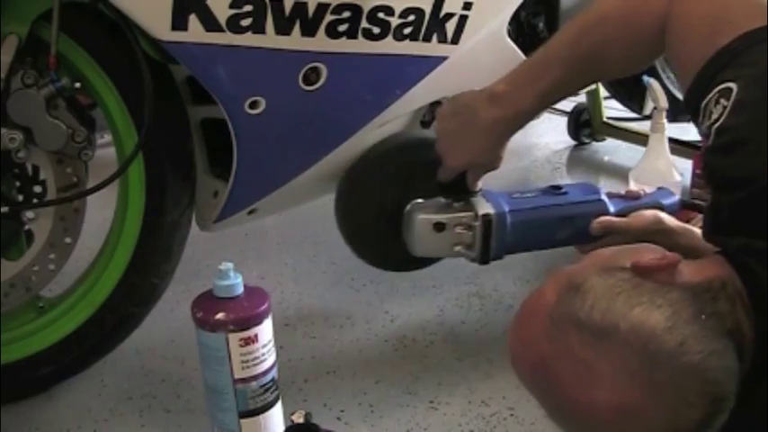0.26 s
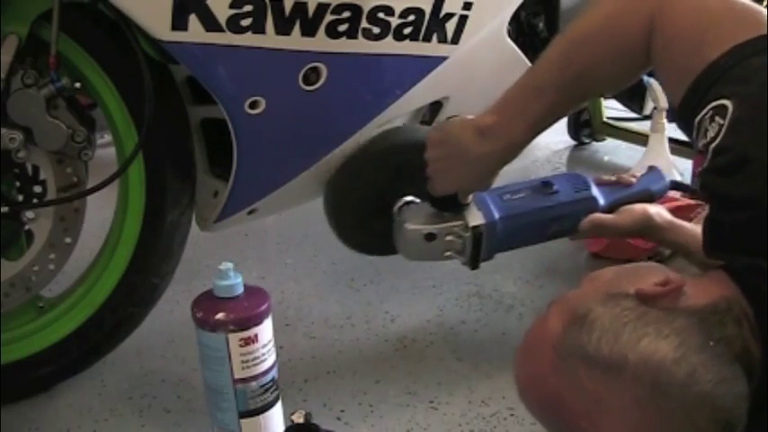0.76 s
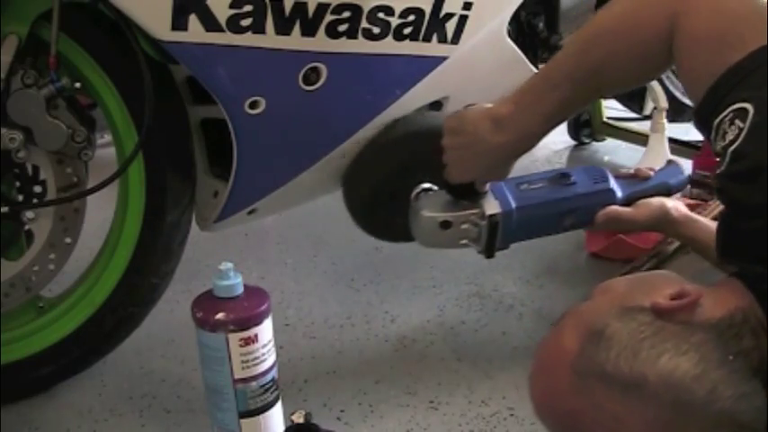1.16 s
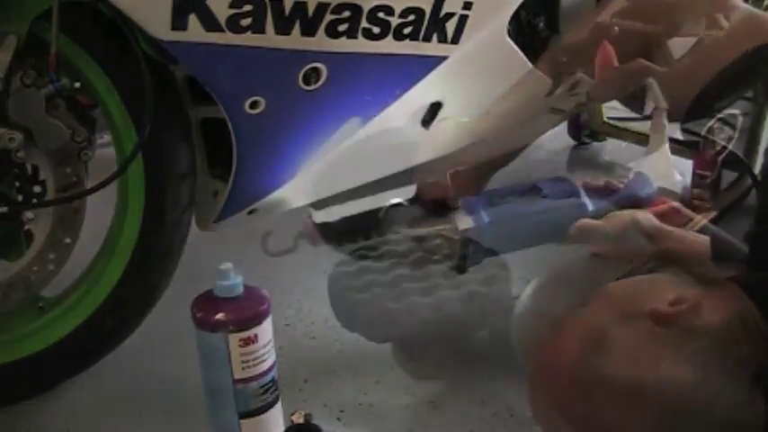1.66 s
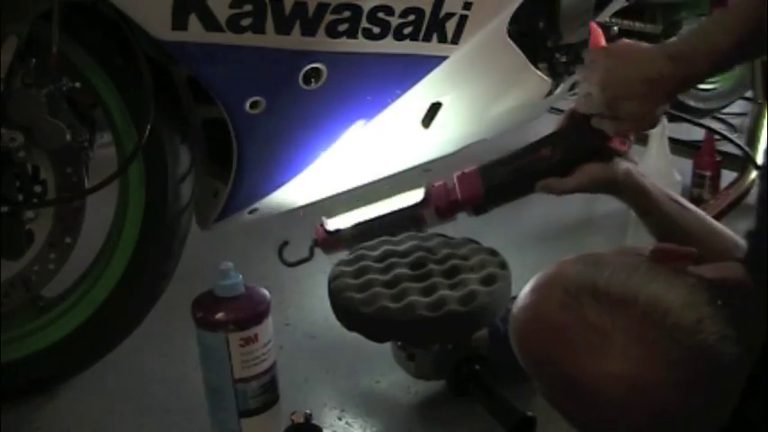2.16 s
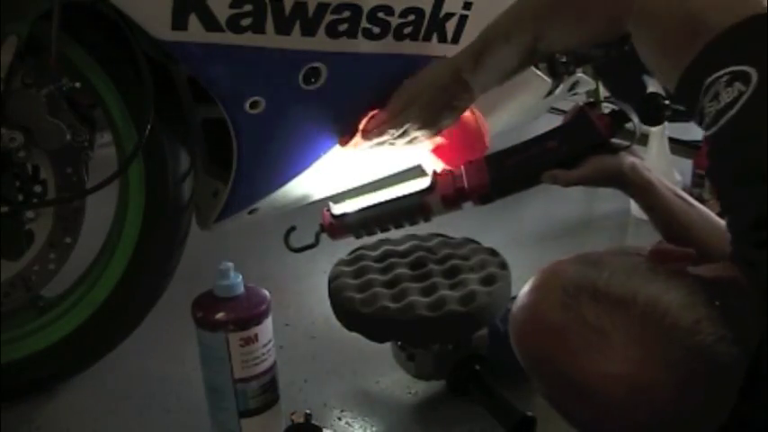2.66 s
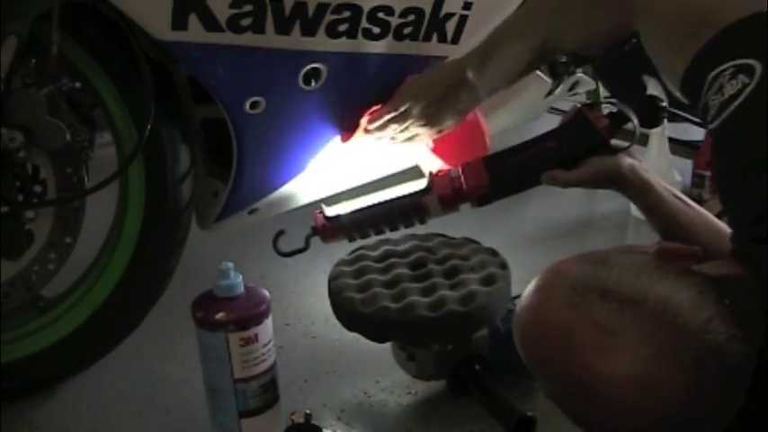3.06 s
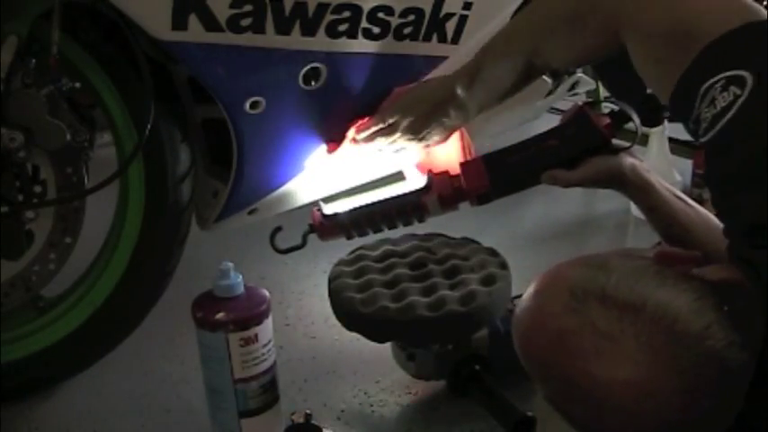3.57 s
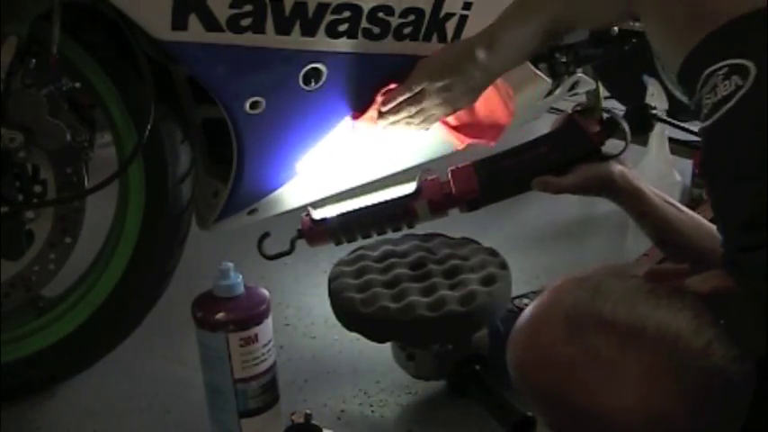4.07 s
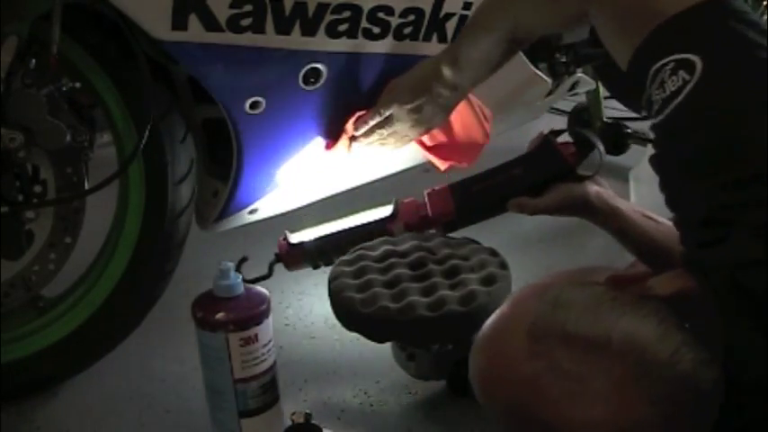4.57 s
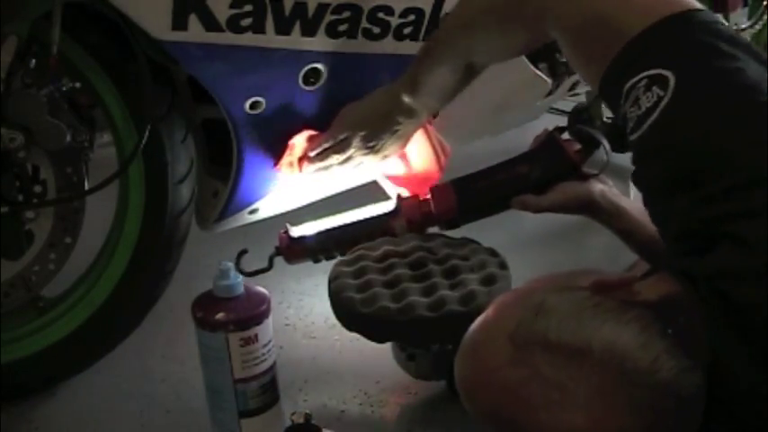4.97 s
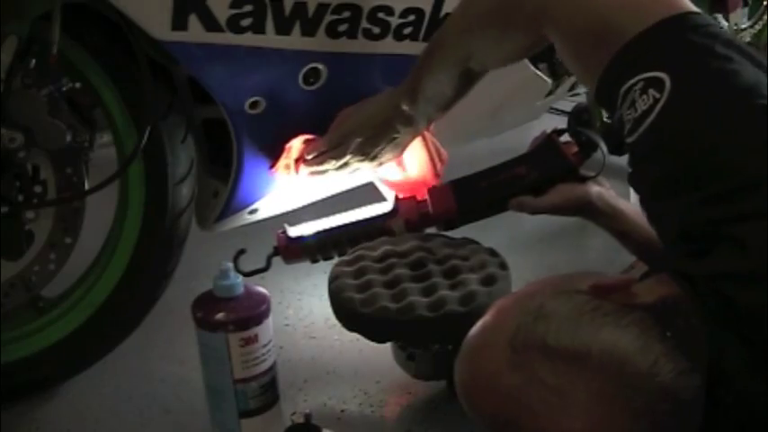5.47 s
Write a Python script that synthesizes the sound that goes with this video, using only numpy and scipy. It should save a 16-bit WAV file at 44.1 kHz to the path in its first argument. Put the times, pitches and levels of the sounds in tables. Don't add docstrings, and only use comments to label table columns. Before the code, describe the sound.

In a garage, an electric rotary polisher runs close to a camcorder microphone, a rough mid-pitched grinding whir with whine, mains buzz and airy fan noise. It swells for about a second, ticks with grit, then fades out by two seconds. Afterwards only faint hiss remains, with soft cloth wipes and a few dull bumps and fingertip taps on a plastic panel.

```python
import sys
import numpy as np
from scipy import signal
from scipy.fft import rfft, irfft
from scipy.io import wavfile
from scipy.ndimage import uniform_filter1d, map_coordinates

SR = 44100
rng = np.random.default_rng(int(sys.argv[2]) if len(sys.argv) > 2 else 0)


def amplitude_ratio(level_db):
    exponent = np.asarray(level_db, float) / 20
    return 10 ** exponent


def dump_mix(stems):
    frames = np.atleast_2d(stems).T
    limited = np.clip(frames, -1, 1)
    pcm = np.round(limited * 32767).astype(np.int16)
    wavfile.write(sys.argv[1], SR, pcm)


N = 252252
T = np.arange(N) / SR
RUN = T[:int(2.1 * SR)]
RING = T[:8192]
MAINS_HZ = 60
FADE_S, SILENT_S = 1.498, 2.018


def unit(x):
    return x / np.sqrt(np.mean(x ** 2))


def colour(x, points, rings=()):
    hz, db = np.transpose(points)
    bins = np.arange(1, len(x) // 2 + 2) * SR / len(x)
    gain_db = np.interp(np.log(bins), np.log(hz), db)
    for centre, width, lift in rings:
        gain_db += lift / (1 + (2 * (bins - centre) / width) ** 2)
    return irfft(rfft(x) * amplitude_ratio(gain_db), len(x))


def filtered(x, hz, kind="low"):
    return signal.lfilter(*signal.butter(2, hz, kind, fs=SR), x)


def walk(rate, size=len(RUN)):
    k = int(SR / rate)
    held = np.repeat(rng.standard_normal(400), k)[:size + 3 * k]
    slewed = uniform_filter1d(uniform_filter1d(held, k), k)
    return 1.16 * slewed[k:size + k]


def burst(t60, rise=.0005):
    return amplitude_ratio(-60 * RING / t60) - amplitude_ratio(-60 * RING / rise)


def add(out, s, sound):
    start = int(s * SR)
    out[start:start + len(sound)] += sound


# speed_multiple, level_db, unsteadiness_db
ORDERS = [(1.976, -36.5, 3), (5.965, -21.5, -0.3), (9.05, -34, 6), (12.08, -28, 2), (13.06, -26.5, -5),
          (16, -24.5, -0.5), (17.89, -19, -1), (19.06, -20.5, 1.5), (36.2, -23, 2), (37, -23.5, 1.5),
          (38.9, -23.5, 4.5), (43.5, -28, -1), (48.4, -28, -6)]
# centre_hz, width_hz, lift_db
RESONANCES = [(488, 24, 2.5), (670, 210, 2), (965, 37, 7.5), (1420, 190, 4.5), (1850, 130, 2),
              (2103, 90, 4.5), (2770, 160, 3), (3100, 170, 4.5), (3760, 160, 2)]


def whine(turns):
    out = np.zeros(len(RUN))
    for k, db, wobble_db in ORDERS:
        level = amplitude_ratio(db + wobble_db * walk(7.093))
        jitter_turns = (.012 + 0.0023 * k) * walk(24.65)
        out += level * np.sin(2 * np.pi * (k * turns + jitter_turns))
    to_end_s = np.minimum(RUN, SILENT_S - RUN)
    effort_db = 1 - 5 * np.clip(1 - to_end_s / 0.23, 0, 1)
    return colour(out, [(1, 0), (20000, 0.0043)], RESONANCES) * amplitude_ratio(effort_db)


# mains_multiple, level_db
HARMONICS = [(1, -51), (3, -34.5), (4, -35), (5, -23.5), (8, -26.5), (9, -29.5), (12, -26.5), (24, -24)]


def buzz(mains):
    out = np.zeros(len(RUN))
    for k, db in HARMONICS:
        level = amplitude_ratio(db + 1.1 * walk(5.7))
        out += level * np.sin(2 * np.pi * (k * mains + rng.random()))
    return out


def clatter(turns, memory, knock_db):
    size = 640
    knocks = np.minimum(rng.exponential(size=(200, size)), 5)
    fresh = rng.standard_normal((200, size)) * amplitude_ratio(knock_db * knocks)
    pattern = signal.lfilter([1], [1, -np.clip(memory, 0, .95)], fresh, axis=0).ravel()
    return unit(map_coordinates(pattern, [turns * size], order=3))


# pitch_hz, level_db (per Hz)
HOUSING = [(13, -68), (22, -34.5), (141, -17), (263, -16), (295, -12.5), (355, -10), (458, -4), (515, -7),
           (857, -6), (985, -6.5), (1130, -7.5), (1390, -6), (2320, -6.5), (3610, -5.5), (5600, -30),
           (7280, -51), (12300, -120)]


def gears(turns, mains, spin):
    chop = 0.073 * np.cos(2 * np.pi * mains) + 0.1 * np.cos(4 * np.pi * mains)
    rub = clatter(turns, memory=0.34, knock_db=2.5)
    rub = rub * (1 + spin + chop) * amplitude_ratio(0.54 * walk(44.96))
    return unit(colour(rub, HOUSING, RESONANCES))


def bounce(x, delay_s, share):
    return x + share * map_coordinates(x, [np.arange(len(x)) - delay_s * SR], order=3)


# pitch_hz, level_db (per Hz)
VENT_AIR = [(2350, -27), (4000, 0.5), (4720, -11), (5350, -14), (6390, -8), (6960, -9), (7760, -10),
            (9010, -6), (10300, -13), (11000, -13), (12600, -20.5), (14600, -29.5), (15700, -45)]


def fan_air(turns, spin):
    air = clatter(turns, memory=0.075, knock_db=2.5)
    air = air * (1 + .9 * spin) * amplitude_ratio(1.23 * walk(15.85))
    fifth_peak_hz = 8500 + 230 * RUN
    air = bounce(air, 5 / fifth_peak_hz, share=0.12)
    return unit(colour(air, [(2000, -55)] + list(VENT_AIR)))


def flares(table, width_hz, length_s):
    out = np.zeros(len(RUN))
    for s, hz, db in table:
        swell = np.sqrt(np.cos(np.pi * np.clip((RUN - s) / length_s, -.5, .5)).clip(0))
        a = unit(filtered(rng.standard_normal(len(RUN)), width_hz / 2))
        b = unit(filtered(rng.standard_normal(len(RUN)), width_hz / 2))
        band = a * np.cos(2 * np.pi * hz * RUN) + b * np.sin(2 * np.pi * hz * RUN)
        out += amplitude_ratio(db) * swell * band
    return out


# middle_s, pitch_hz, level_db
FAIRING_FLARES = [(0.37, 967, -9.5), (1.03, 978, -15), (1.78, 1100, -25), (0.42, 1211, -17),
                  (0.9, 1211, -19.5)]
PANEL_FLARES = [(0.41, 2095, -12), (0.42, 2700, -21), (0.73, 3180, -11.5), (0.68, 3710, -18),
                (0.98, 3600, -9.5), (0.98, 2790, -11.5), (0.93, 1780, -14.5), (1.319, 3150, -18),
                (1.53, 3730, -11.5), (1.65, 1755, -13.5), (1.8, 2730, -15)]
VENT_FLARES = [(.15, 10700, -33), (.52, 6880, -27), (.7, 9220, -24), (1.0, 10800, -32), (1.25, 9120, -22.5),
               (1.25, 7200, -28.5), (1.68, 8750, -22.5), (1.6, 12300, -36), (1.8, 7090, -31)]


def body():
    fairing = flares(FAIRING_FLARES, width_hz=4, length_s=0.5)
    panel = flares(PANEL_FLARES, width_hz=67, length_s=0.46)
    vents = flares(VENT_FLARES, width_hz=160, length_s=0.59)
    return fairing + panel + vents


# time_s, armature_hz
ARMATURE = [
    (0, 78.54),
    (.14, 77.88),
    (.27, 80.46),
    (.54, 79.74),
    (.78, 75.06),
    (1.1, 76.5),
    (1.25, 76.4),
    (1.39, 71.04),
    (1.72, 74.37),
    (2.0, 72.4),
]


def polisher():
    turns = np.cumsum(np.interp(RUN, *np.transpose(ARMATURE))) / SR
    mains = MAINS_HZ * RUN
    spin = 0.14 * np.cos(2 * np.pi * turns) + 0.098 * np.cos(4 * np.pi * turns)
    tones = 1.58 * (whine(turns) + buzz(mains))
    air_db = -14 - 4.5 * np.maximum(RUN - FADE_S, 0) + 1.48
    return amplitude_ratio(-1.0) * gears(turns, mains, spin) + tones + body() + amplitude_ratio(air_db) * fan_air(turns, spin)


# pitch_hz, side_minus_mid_db
WALL_RETURN = [(60, -4), (110, -6), (200, -11), (380, -17), (700, -18), (1290, -18), (2380, -12.5),
               (4400, -12), (6000, -8), (8120, -14), (11000, -6), (15000, -4)]


def garage(tool):
    echo = rng.standard_normal(len(RING)) * burst(0.38)
    returned = signal.fftconvolve(tool, echo / np.linalg.norm(echo))[:len(RUN)]
    return colour(returned, WALL_RETURN)


# start_s, level_db (peak), pitch_hz, crack_db
GRIT = [
    (0.3489, -12, 2870, -15),
    (1.1766, -14, 2767, -23),
    (1.182, -14, 2770, -23),
    (1.2150, -13, 3410, -12),
    (1.7078, -10, 3528, -27),
    (1.7464, -9.5, 3060, -17),
]


def ticks():
    out = np.zeros(len(RUN))
    for s, db, hz, crack_db in GRIT:
        ring = np.sin(2 * np.pi * hz * RING) * burst(.007, 0.0016)
        crack = rng.standard_normal(len(RING)) * burst(.012)
        add(out, s, amplitude_ratio(db) * (2.0 * ring + amplitude_ratio(crack_db) * crack))
    return out


# pitch_hz, level_db (per Hz)
MIC_NOISE = [(15, -43), (25, -29), (59, -3), (268, -3), (360, -2.5), (525, -3), (635, -2), (1120, -5.5),
             (1770, -7), (2020, -9.5), (3200, -10), (4070, -13), (5940, -16.5), (7990, -18), (14100, -33),
             (15700, -35)]


def hiss():
    level_db = -64.5 + 1.06 * (T - SILENT_S) - 6.5 * np.maximum(T - 5.16, 0)
    pair = np.array([unit(colour(rng.standard_normal(N), MIC_NOISE)) for _ in range(2)])
    return pair * amplitude_ratio(level_db + 14.0)


# start_s, level_db (peak), pitch_hz, ring_s
KNOCKS = [
    (2.565, -45, 293, 0.061),
    (2.679, -46, 773, 0.067),
    (3.619, -47, 393, 0.08),
    (4.549, -47, 756, 0.08),
    (4.889, -39, 357, 0.1),
    (5.07, -43, 856, 0.096),
    (5.093, -38.5, 730, 0.1),
    (5.129, -43, 376, 0.11),
    (5.225, -45, 800, 0.12),
]
# start_s, level_db (peak), pitch_hz, ring_s
FINGERTIPS = [
    (2.567, -48, 800, .06),
    (3.107, -49, 1100, .05),
    (3.132, -40, 1250, .03),
    (3.134, -44, 900, .03),
    (3.134, -42, 1580, .025),
    (3.148, -52, 1315, .08),
    (4.893, -44.5, 970, .05),
    (5.096, -47, 1100, .04),
]


def bumps():
    out = np.zeros(N)
    for s, db, hz, t60 in KNOCKS:
        knock = filtered(rng.standard_normal(len(RING)), [hz * 0.67, hz * 1.7], "band")
        add(out, s, amplitude_ratio(db - 7.0) * unit(knock) * burst(1.9 * t60, .006))
    for s, db, hz, t60 in FINGERTIPS:
        add(out, s, 1.54 * amplitude_ratio(db) * np.sin(2 * np.pi * hz * RING) * burst(t60, 0.0089))
    return out


# pitch_hz, level_db (per Hz)
FIBRES = [(120, -36), (250, 2), (500, -0.5), (1000, -0.5), (1800, -12.5), (3500, -17), (7000, -24.5),
          (12000, -33)]
# peak_s, level_db, brightness_hz
WIPES = [
    (2.6, -53, 650),
    (3.6, -56.5, 400),
    (4.17, -51.5, 1150),
    (4.72, -52, 1130),
    (5.12, -52, 750),
    (5.7, -53.5, 600),
]


def cloth():
    rise_s, fall_s, rest_hz = .12, 0.17, 510
    level = np.full(N, amplitude_ratio(-63))
    weighted_hz = level * rest_hz
    for s, db, hz in WIPES:
        stroke = amplitude_ratio(db) * np.exp(np.where(T < s, (T - s) / rise_s, (s - T) / fall_s))
        level = level + stroke
        weighted_hz = weighted_hz + stroke * hz
    share = np.clip(weighted_hz / level / 1200, 0, 1)
    fibres = colour(rng.standard_normal(N) * amplitude_ratio(1.1 * walk(40, size=N)), FIBRES)
    dull = unit(filtered(fibres, 600))
    bright = unit(filtered(fibres, 700, "high"))
    return (np.sqrt(1 - share) * dull + np.sqrt(share) * bright) * level


def quiet():
    hand = cloth() + bumps()
    both = hiss() + np.array([np.roll(hand, 1), hand])
    return both * np.clip((T - 1.55) / 0.41, 0, 1)


def scene():
    tool = polisher()
    swell = np.interp(RUN, [0, 0.83], amplitude_ratio([-26.5, -16.5]))
    gain = swell * np.clip((SILENT_S - RUN) / (SILENT_S - FADE_S), 0, 1) ** 1.035
    side = gain * garage(tool)
    mid = gain * tool + ticks()
    pan = amplitude_ratio(0.6 / 2)
    out = quiet()
    out[:, :len(RUN)] += np.array([(mid + side) * pan, (mid - side) / pan])
    return out


def band_limit(x):
    return signal.sosfilt(signal.butter(12, 15830, fs=SR, output="sos"), x)


def record(dry):
    rounded = np.tanh(1.136 * dry) / 1.056
    mix = signal.sosfilt(signal.ellip(8, .2, 60, 15570, fs=SR, output="sos"), rounded)
    return band_limit(mix)


dry = scene()
out = record(dry)
dump_mix(out)
```